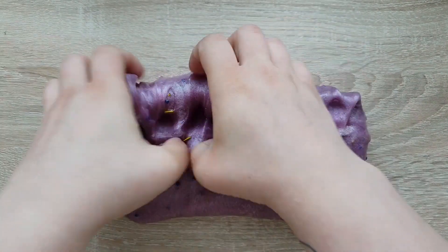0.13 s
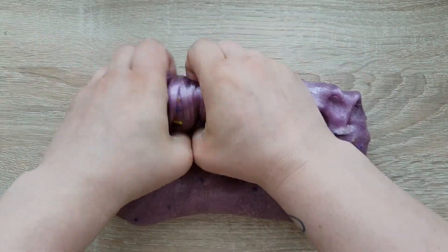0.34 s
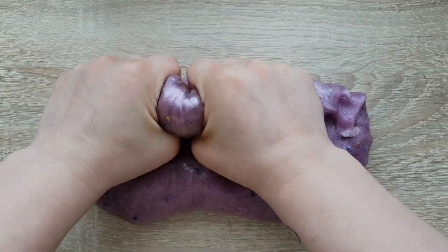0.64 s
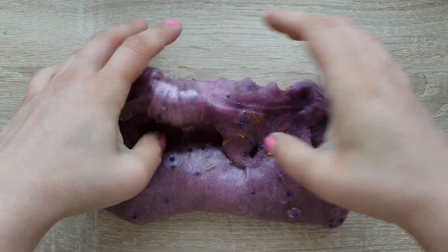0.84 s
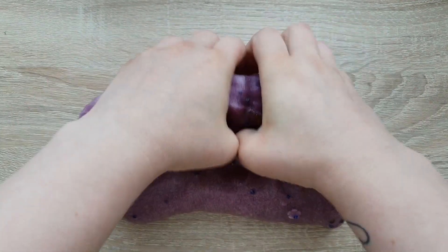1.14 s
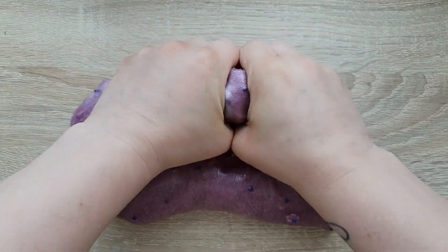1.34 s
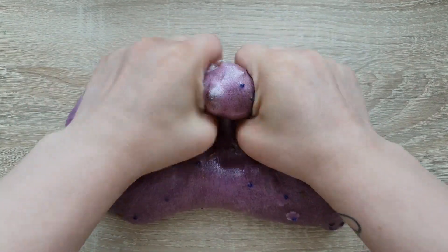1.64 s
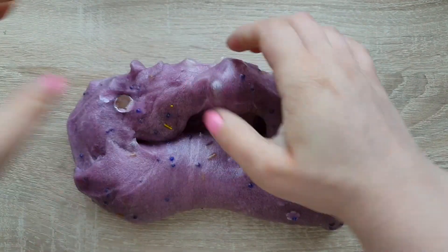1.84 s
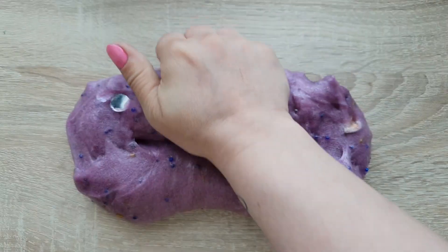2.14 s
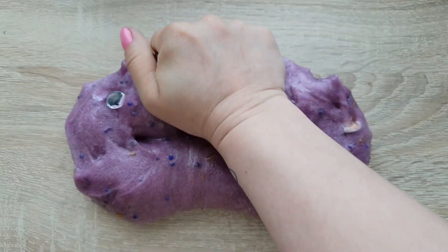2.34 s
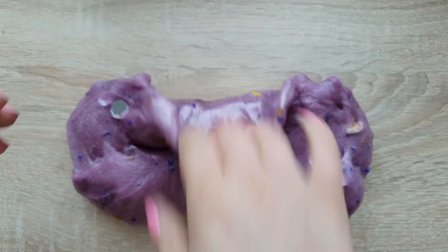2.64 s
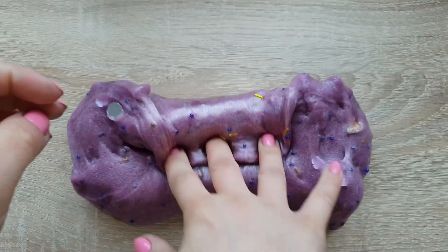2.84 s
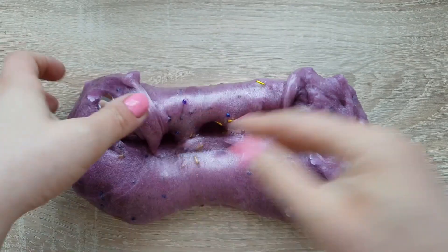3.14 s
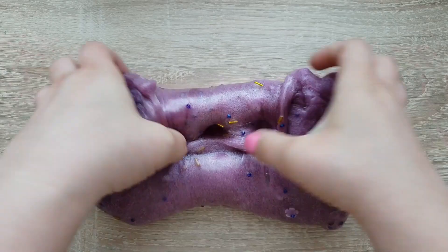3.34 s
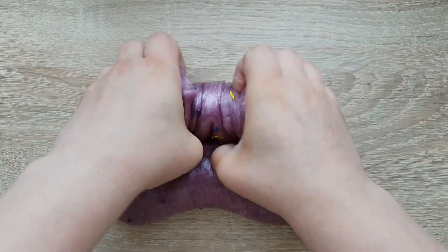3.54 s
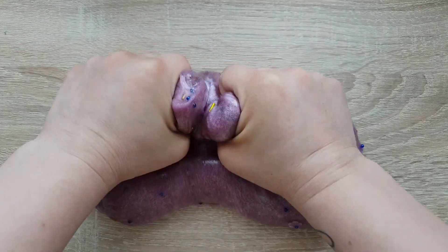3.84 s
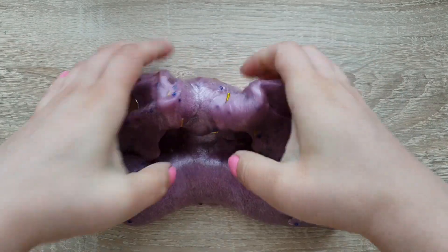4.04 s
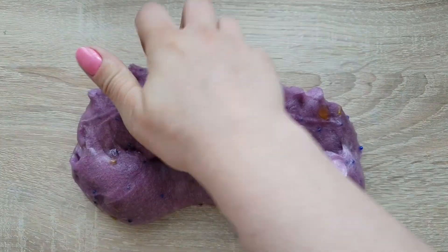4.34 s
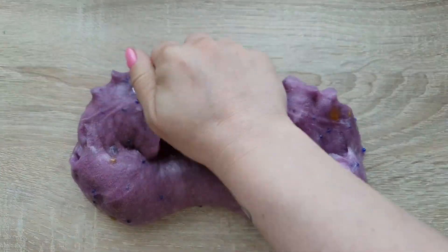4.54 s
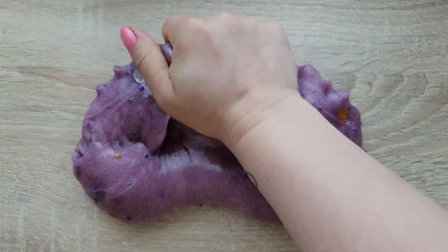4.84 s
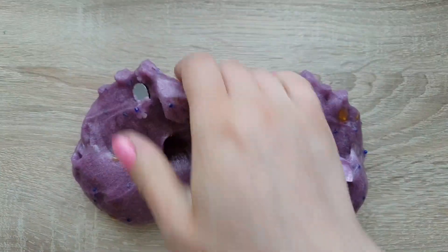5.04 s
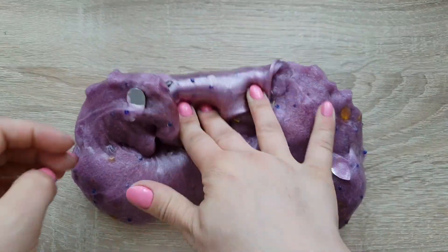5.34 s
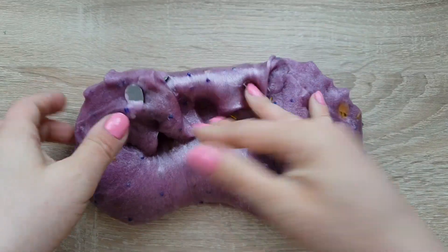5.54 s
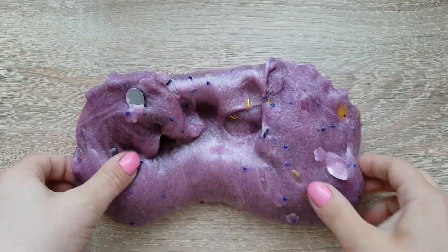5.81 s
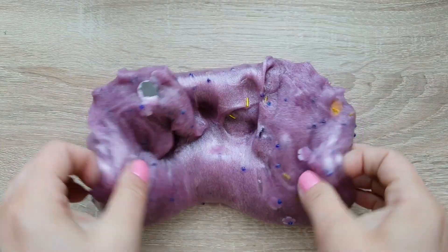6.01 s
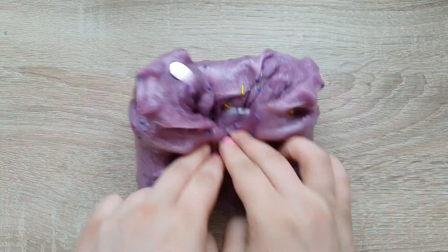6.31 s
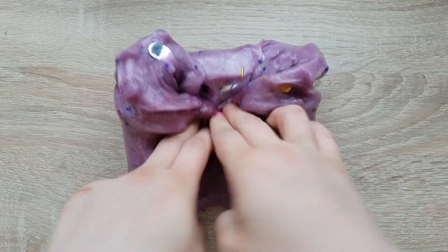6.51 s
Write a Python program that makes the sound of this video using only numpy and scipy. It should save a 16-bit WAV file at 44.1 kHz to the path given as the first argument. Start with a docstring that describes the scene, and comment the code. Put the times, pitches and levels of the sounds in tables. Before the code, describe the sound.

Close, wet pops and crackles come in uneven bursts as thick slime is kneaded by hand. The sharpest clusters fall in the first half, one followed by a faint squelch. Later the slime rubs and peels with a sticky fizz, and the hands bump the wooden table, most strongly at the end. It is heard in stereo from above, in a small, quiet room with a faint low rumble.

```python
"""A small room, a wooden table: two hands squeeze and fold a lump of thick slime.
Trapped air pockets burst as sharp pops, some with a brief tail; sticky skin peels off as a fizz
of tiny pops; a closing air gap squelches. Pushes, rubs and knocks ring the table top, and the
frame sways. Two spaced microphones listen from above, over faint house rumble and hiss."""
import sys
import numpy as np
from scipy import signal
from scipy.io import wavfile

SR = 44100
rng = np.random.default_rng(int(sys.argv[2]) if len(sys.argv) > 2 else 0)


def inscribe(sig):
    """Save sig as 16-bit PCM at rate SR to the path in sys.argv[1].

    A 1-D sig is mono; a 2-D sig holds one channel per row.
    Samples are clipped to [-1, 1] before scaling.
    """
    pcm = np.round(np.clip(np.atleast_2d(sig).T, -1, 1) * 32767)
    wavfile.write(sys.argv[1], SR, pcm.astype(np.int16))


N = 294147

# House rumble and microphone hiss. Each row: frequency in Hz, relative density in dB.
BACKGROUND_SPECTRUM = [(59, -25.5), (100, -3.5), (119, -11), (206, -1.5), (239, -3), (365, -53.5),
                       (570, -36.5), (1310, -37.5), (7610, -34.5), (16000, -57.5)]
# Diffuse sound. Each row: frequency in Hz, left-right correlation.
STEREO_LIKENESS = [(60, 0.43), (290, .92), (640, 0.11), (1400, 0.05), (3000, 0.008)]
# Resonances of legs and frame. Each row: centre in Hz, width in Hz, relative level in dB.
FRAME_MODES = [(49.6, 8.9, 4.5), (72.4, 42, -5.5), (92.2, 8.7, 5), (151, 120, 3.5)]
# Sway of the frame. Each row: time in seconds, level in dB.
SWAY_LEVELS = [(0.0, -57.5), (0.72, -84), (0.82, -60.5), (1.018, -72.5), (1.03, -45.5), (1.24, -67),
               (3.05, -66.5), (3.14, -53.5), (3.34, -65), (3.7, -68), (3.81, -55), (3.86, -63),
               (4.05, -62.5), (4.83, -71), (4.9, -64), (5.57, -53), (5.85, -57), (6.11, -53), (6.35, -57.5),
               (6.65, -47), (6.67, -58)]
# Table top modes. Each row: frequency in Hz, gain in dB, T60 in seconds.
TOP_MODES = [(173, -21.5, 0.14), (238, -8, 0.3), (287.8, -13.5, 0.18), (300, -4.5, 0.073), (399, -7, 0.077),
             (476.5, -4.5, 0.022), (547.6, 0.5, 0.086), (603, 3, 0.022), (903, -4, 0.055),
             (1182, -12.5, 0.028), (1402, -7.5, 0.006)]
# Hands lean on the top or let go. Each row: start and hold in seconds, relative level in dB.
HAND_PUSHES = [(0.0, 0.011, -41), (0.469, 0.36, -49), (0.81, 0.12, -55), (1.031, 0.035, -47),
               (1.248, 0.023, -55), (1.774, 0.03, -41), (2.216, 0.17, -46), (3.102, 0.053, -40.5),
               (3.702, 0.26, -51), (3.983, .03, -43.5), (4.953, 0.062, -47.5), (5.551, 0.032, -41.5),
               (6.205, 0.14, -51), (6.458, .05, -38.5), (6.617, .05, -29.5)]
# Slime rubbed along the top. Each row: start and hold in seconds, relative level in dB.
SLIME_RUBS = [(0.08, 0.025, -57), (1.03, 0.14, -68.5), (2.85, 0.16, -67.5), (3.1, 0.019, -40.5),
              (3.2, 0.36, -60.5), (5.305, 0.017, -67), (5.4, 0.044, -54.5), (5.525, 0.11, -48.5),
              (5.78, 0.017, -48.5), (5.93, 0.11, -46.5), (6.065, 0.095, -53.5), (6.43, 0.07, -54.5),
              (6.6, .07, -39)]
# Fingers and slime land. Each row: start in seconds, relative level in dB, slap over that in dB.
TABLE_KNOCKS = [(0.081, -37.5, -10), (0.405, -29.5, -24), (0.498, -39, 19.5), (0.515, -35, 10),
                (1.0225, -38.5, 3), (1.0327, -33.5, 0.5), (1.051, -36, -3), (1.068, -34.5, 6),
                (1.32, -47.5, 5), (1.41, -27.5, 12.5), (2.189, -35.5, 21), (2.317, -35, 17.5),
                (2.911, -43.5, -15), (3.08, -42.5, -8), (3.1, -21.5, -2), (3.321, -43.5, -0.5),
                (3.499, -37, 6), (3.654, -45.5, 13.5), (3.698, -39, 17.5), (3.768, -32.5, -9),
                (5.305, -36, 5), (5.368, -35, -12), (5.396, -26.5, -1), (5.531, -27.5, -13.5),
                (5.548, -31, -26), (5.927, -30.5, -5.5), (6.065, -37.5, -2), (6.423, -41.5, 6),
                (6.46, -39.5, 10), (6.489, -35, -4), (6.508, -33, 4), (6.565, -39, -8), (6.599, -24, -23),
                (6.613, -21.5, 0.5), (6.636, -23, -12), (6.656, -20, -23)]
# Faint fizz under slow hands. Each row: time in seconds, pocket and tick levels in dB.
CREEP_FIZZ = [(0.0, -67, -68), (0.2, -70, -76.5), (0.9, -79, -87), (1.15, -66.5, -66), (1.35, -64, -80.5),
              (2.1, -87.5, -83), (2.55, -52.5, -52.5), (2.86, -89, -72.5), (3.3, -73, -69.5),
              (3.45, -60, -59.5), (4.35, -88.5, -83), (4.65, -60.5, -69), (4.8, -73, -73),
              (4.9, -65, -62.5), (5.25, -83, -70.5), (5.7, -72.5, -72.5), (5.85, -73, -79),
              (6.35, -63.5, -62.5), (6.67, -77, -79)]
# Fizz after a burst. Each row: start and hold in seconds, pocket, tick and sizzle levels in dB.
AFTER_FIZZ = [(0.25, 0.0049, -61.5, -53, -66.5), (0.4, 0.11, -55.5, -41, -55.5),
              (0.49, 0.082, -49.5, -40.5, -55.5), (0.605, 0.0074, -69.5, -33.5, -50.5),
              (1.395, 0.055, -44, -41.5, -40), (1.475, 0.016, -62, -43, -40), (1.55, 0.052, -53, -46, -49),
              (2.195, 0.056, -43, -59.5, -59), (2.33, 0.013, -60.5, -38, -59),
              (2.375, 0.018, -45.5, -42.5, -78), (3.505, .04, -62.5, -58, -44.5),
              (3.6, 0.014, -65, -57, -59), (3.72, 0.017, -51.5, -43, -55), (3.805, 0.0087, -64, -36, -40.5),
              (4.5, 0.08, -71, -66.5, -89.5), (6.03, 0.08, -66, -58, -54)]
# Skin comes unstuck. Each row: start and hold in seconds, pocket and tick levels in dB.
SKIN_PEELS = [(0.735, 0.029, -40.5, -44), (1.06, 0.0077, -52, -67), (1.7, 0.0078, -39, -44),
              (2.74, 0.0064, -79, -66), (2.93, 0.02, -67.5, -59.5), (3.105, 0.0041, -51.5, -43),
              (3.98, 0.04, -41, -44), (4.96, 0.012, -43, -45.5), (5.37, 0.0043, -48, -58),
              (5.535, 0.014, -48, -46.5), (5.935, 0.29, -55.5, -51.5), (6.47, 0.015, -68, -64),
              (6.605, .07, -42.5, -45.5)]
# Air pockets burst. Each row: start in seconds, cavity pitch in Hz and relative level in dB,
# film pitch in Hz and relative level in dB, relative snap level in dB, ragged trail offset in dB.
POCKET_POPS = [(0.2183,3100,-34,7000,-31,-31,-5.5),(0.3434,2720,-26,6030,-18.5,-17,-6),(.395,2380,-34,5370,-9.5,-8.5,-4),(0.4038,2660,-34,4300,-13,-29,-2),
               (0.4163,2830,-29,14000,-18,-25,2),(.435,734,-50,5800,-36,-25,-3),(.457,2430,-44,13500,-16,-21,1),(.481,2160,-9.5,8500,-6.5,-4,-4),
               (0.4976,2220,-18.5,5700,-6,-12,0.5),(.5165,1680,-21.5,5100,-48,-22,-2),(.5804,1630,-20.5,3140,-18.5,-42,-1),(.599,2000,-26,11400,-25,-8,1),
               (.617,2200,-33,7780,-28,-18,-3),(.849,1600,-52,2970,-39,-62,-3),(1.023,2010,-42,3600,-45,-59,0),(1.031,1002,-40,4490,-39,-54.5,-0.5),(1.063,1900,-28,4030,-37,-59,3),
               (1.151,1500,-66,13000,-42,-56,0),(1.3222,800,-59.5,3300,-44.5,-51,1),(1.3783,1980,-58,5050,-65,-43.5,0),(1.3855,2620,-29,12500,-21,-33,5),
               (1.3918,2530,-21,4030,-12.5,-8.5,-1),(1.4104,1350,-14,2870,-19.5,-32,3.5),(1.4694,1800,-24.5,7350,-16,-20.5,-0.5),(1.4904,2800,-35,8300,-19,-12.5,-2.5),
               (1.5444,2210,-22.5,7000,-24,-11.5,-3.5),(2.1897,2310,-14,4400,-17.5,-24,-2.5),(2.2973,2020,-25,5300,-26,-39,-2),(2.318,784,-23.5,4300,-35,-47,-3),
               (2.3224,2250,-24,7000,-14,-22,-4),(2.3252,1720,-29,6400,-10.5,-22,1.5),(2.3624,1450,-8.5,5050,-12.5,-20,1),(2.372,2320,-12.5,6600,-17,-19,-1.5),
               (2.794,2400,-49,4500,-46,-51,2.5),(2.857,2420,-71,7500,-56,-64,-6),(2.884,2390,-69,7000,-45,-56,-3),(2.9,2400,-62,6470,-48,-45,-3),
               (2.917,930,-71,7000,-42.5,-47,-2),(2.9401,800,-49.5,6560,-53,-42,-3),(2.951,2260,-54,7400,-37,-40,0),(2.97,2410,-49,4400,-48,-49,3),
               (2.9797,1030,-61,7150,-45,-34,0.5),(3.0941,2500,-33,8000,-25,-15,-1.5),(3.097,710,-26.5,3070,-29,-17,-4.5),(3.4022,960,-51,4640,-40,-53,-1),
               (3.456,1010,-57,14500,-35,-44,1),(3.4593,1510,-48,7660,-35,-37,2.5),(3.4892,2060,-52,3500,-30.5,-40,-2),(3.4979,2480,-47,11600,-6.5,-19,-5.5),
               (3.599,2580,-33.5,4660,-33.5,-46,-1.5),(3.6548,1930,-23.5,3540,-27,-45,-4),(3.6605,2440,-24,9000,-12,-16,1),(3.6644,1720,-23.5,4100,-21,-37,-3),
               (3.6839,2750,-27,5500,-23,-22,-1),(3.6985,910,-28,8500,-17,-9.5,-3),(3.7141,930,-38,2900,-30.5,-35.5,2),(3.7626,2200,-20.5,4360,-34,-13,-6),
               (3.7982,2080,-30,7000,-25,-5,-3),(3.8328,2200,-48,4530,-34.5,-28,5),(3.9975,1860,-26.5,3780,-36,-27.5,0),(3.9994,850,-24,6000,-29,-31,4.5),
               (4.1111,1850,-44.5,10560,-33,-39,-1),(4.431,1410,-69,4550,-54.5,-38,-7.5),(4.4925,2000,-61,5980,-48,-64.5,0.5),(4.533,2000,-74,6500,-40.5,-56,-3.5),(4.622,2500,-52,4500,-56,-65,-7),
               (4.643,1630,-42.5,6100,-48,-38,-1.5),(4.6784,2400,-37.5,4180,-58,-74,-5),(4.694,2410,-45,7550,-37.5,-39,-2.5),(4.698,2000,-47,6000,-46,-48,1),(4.74,2000,-55,6000,-58,-47,-4),
               (4.7701,1980,-32.5,4180,-38,-46,1),(4.862,2400,-60,3980,-49.5,-62.5,-3),(5.307,950,-30.5,3500,-53,-49,-0.5),(5.3493,1350,-36,7500,-46,-56,0),
               (5.367,2910,-48,5400,-32.5,-33.5,-0.5),(5.397,680,-39,2580,-35,-49,-5),(5.521,2780,-51.5,9000,-33,-44,7),(5.548,710,-26,3020,-55,-60,-3),
               (5.5735,950,-29.5,3000,-48,-60.5,-2),(5.97,3020,-29,7400,-32.5,-47,0.5),(6.0243,2240,-28.5,13700,-27,-27,-0.5),(6.065,960,-35,6100,-53,-28,-1.5),
               (6.106,2180,-40,3530,-36,-44,-3),(6.1458,1960,-56,3530,-37,-37,1),(6.2014,2430,-46,4100,-22.5,-34,-3),(6.2806,1960,-27.5,6050,-40,-60,-3),
               (6.345,2920,-28.5,13000,-39,-38,2),(6.376,2500,-31,13600,-17,-33,-3),(6.4425,870,-44,6000,-37,-42,-1),(6.597,627,-44,7000,-42,-42,7),
               (6.613,520,-22,4800,-26,-26,3),(6.656,2700,-23,5600,-38,-33,6)]
# Noise lingering after a pop or knock. Each row: start and hold in seconds, centre in Hz, level in dB.
POP_TAILS = [(0.39, 0.027, 4600, -50), (0.485, 0.039, 8200, -37), (0.602, 0.041, 11200, -37.5),
             (1.059, .018, 2110, -51.5), (1.066, .016, 1010, -50), (1.385, .02, 12400, -32),
             (2.187, 0.059, 12000, -49), (2.37, 0.039, 7300, -38.5), (3.506, 0.036, 10600, -44),
             (6.602, 0.085, 392, -35), (6.609, 0.041, 2720, -42)]
# A closing air gap. Each row: time in seconds, pitch in Hz, level in dB.
SQUELCH_PATH = [(2.38, 1355, -92), (2.45, 1370, -59), (2.6, 1500, -54), (2.7, 1614, -80),
                (2.745, 2044, -59), (2.78, 2020, -90)]
# Reverberation. Each row: frequency in Hz, T60 in seconds, relative level in dB.
ROOM_BANDS = [(197.8, 0.89, -8.5), (497, 0.45, -5), (1558, 0.44, -4.5), (3390, 0.4, -0.5), (7000, 0.25, 0),
              (10830, 0.1, 5), (15500, 0.19, -4)]

POP_SAMPLES = 600


def from_db(db):
    return 10 ** (np.asarray(db) / 20)


def unit_rms(x):
    return x / np.sqrt(np.mean(x ** 2) + 1e-20)


def at_hz(rows, hz, column=1):
    rows = np.array(rows)
    return np.interp(np.log(hz), np.log(rows[:, 0]), rows[:, column])


def in_time(rows):
    time_s, *columns = np.transpose(rows)
    return [np.interp(np.arange(N) / SR, time_s, column) for column in columns]


def band(x, low_hz, high_hz):
    sos = signal.butter(2, [low_hz, min(high_hz, 20000)], "band", fs=SR, output="sos")
    return signal.sosfilt(sos, x)


def ring(clicks, hz, t60_s):
    """A unit click starts a decaying sine of height 1."""
    r, w = from_db(-60 / (t60_s * SR)), 2 * np.pi * hz / SR
    return signal.lfilter([0, np.sin(w)], [1, -2 * r * np.cos(w), r * r], clicks + 1e-18)


def wet_ring(hz, level_db, t60_cycles):
    """A few damped cycles with a rounded start."""
    cycles = hz * np.arange(POP_SAMPLES) / SR
    onset = 1 - np.exp(-cycles / 1.215)
    return np.sin(2 * np.pi * cycles) * onset * from_db(level_db - 60 * cycles / t60_cycles)


def grains(per_s, spread_db):
    """Random clicks of uneven size and sign; rms 1."""
    sizes = from_db(spread_db * np.minimum(rng.exponential(1, N), 3.0)) * rng.choice([-1, 1], N)
    return unit_rms(sizes * (rng.random(N) < per_s / SR))


def bursts(starts, t60_s, alike):
    """Each start sets off dying noise, partly shared by both sides."""
    shared = np.sqrt(alike) * rng.standard_normal(N)
    noise = shared + np.sqrt(1 - alike) * rng.standard_normal((2, N))
    return noise * signal.lfilter([1], [1, -from_db(-60 / (t60_s * SR))], starts + 1e-18)


def diffuse(size, gain_at_hz):
    """Stereo noise in half-octave bands; the sides part towards the treble."""
    out, edges_hz = 0, 28 * 2 ** np.arange(0, 10, .5)
    white = rng.standard_normal((2, 2, size))
    for k, (low_hz, high_hz) in enumerate(zip(edges_hz, edges_hz[1:])):
        mid, side = band(white[k % 2], low_hz, high_hz)
        hz = np.sqrt(low_hz * high_hz)
        alike = at_hz(STEREO_LIKENESS, hz)
        out += gain_at_hz(hz) * (np.sqrt(1 + alike) * mid + np.sqrt(1 - alike) * side * [[1], [-1]])
    return out


def swells(rows, rise_db_per_s, fall_db_per_s):
    """Rows rise, hold, fall and add in power; one dB curve per level column."""
    t, rows = np.arange(0, N + 64, 64) / SR, np.array(rows)
    start_s, end_s = rows[:, [0]], rows[:, [0]] + rows[:, [1]]
    shape_db = -rise_db_per_s * np.maximum(start_s - t, 0) - fall_db_per_s * np.maximum(t - end_s, 0)
    power = from_db(2 * rows[:, 2:].T) @ from_db(2 * shape_db) + 1e-14
    return np.array([np.interp(np.arange(N) / SR, t, 10 * np.log10(p)) for p in power])


def background(level_db=-77):
    """Steady house rumble and microphone hiss."""
    noise = diffuse(N, lambda hz: from_db(at_hz(BACKGROUND_SPECTRUM, hz)))
    return from_db(level_db) * unit_rms(noise)


def frame_sway():
    """The whole table rocks at a few broad, low resonances."""
    level_db, = in_time(SWAY_LEVELS)
    modes = [from_db(db) * unit_rms(band(rng.standard_normal(N), hz - width_hz / 2, hz + width_hz / 2))
             for hz, width_hz, db in FRAME_MODES]
    side = [[.15], [-.15]] * sum(modes[1::2])[::-1]
    return from_db(level_db) * unit_rms(sum(modes) + side)


def table_top(peel_db):
    """Pushes drive the low modes, rubs and tugs of the fizzing slime the higher; knocks ring all, thump and
    slap."""
    push_db, = swells(HAND_PUSHES, rise_db_per_s=503.5, fall_db_per_s=88.5)
    rub_db, = swells(SLIME_RUBS, rise_db_per_s=901.5, fall_db_per_s=199)
    tugs = grains(per_s=600, spread_db=4.8) * (from_db(rub_db - 28) + from_db(peel_db - 39))
    kneading = rng.standard_normal(N) * from_db(push_db - 30.5)
    push_s, _, thud_db = np.transpose(HAND_PUSHES)
    kneading[(push_s * SR).astype(int)] += from_db(thud_db + 2.5)   # each push opens with a thud
    knock_s, knock_db, slap_db = np.transpose(TABLE_KNOCKS)
    at = (knock_s * SR).astype(int)
    scatter_db = rng.normal(0, 2.5, (len(at), len(TOP_MODES)))
    wood, thumps, slaps = np.zeros((3, N))
    for k, (hz, gain_db, t60_s) in enumerate(TOP_MODES):
        # A fingertip hardly moves the lowest modes.
        drive, coupling_db = (kneading.copy(), -18) if hz < 300 else (tugs.copy(), -11)
        drive[at] += from_db(knock_db + coupling_db + scatter_db[:, k])
        wood += (-1) ** k * from_db(gain_db) * ring(drive, hz, t60_s)
    thumps[at] = from_db(knock_db + 16.5)   # soft weight of the hand
    slaps[at] = from_db(knock_db + slap_db)
    return wood + band(thumps + 1e-18, 60, 230) + band(bursts(slaps, t60_s=.045, alike=.8), 400, 2500)


def fizz_levels():
    """dB curves for fizz(); peels, after-fizz and creep add in power."""
    peel_db = swells(SKIN_PEELS, rise_db_per_s=460, fall_db_per_s=159)
    *after_db, sizzle_db = swells(AFTER_FIZZ, rise_db_per_s=3000.5, fall_db_per_s=120)
    creep_db = in_time(CREEP_FIZZ)
    pocket_db, tick_db = 10 * np.log10(sum(from_db(db) ** 2 for db in (peel_db, after_db, creep_db)))
    suction_db = peel_db[0] - 17.5   # peels also open the largest pockets
    crackle_db = creep_db[1] - 8.5   # lone ticks follow the creep
    return pocket_db, tick_db, suction_db, sizzle_db, crackle_db


def fizz(pocket_db, tick_db, suction_db, sizzle_db, crackle_db):
    """Tiny pockets open along the peeling contact: larger ones ring, the finest only tick."""
    pockets = np.zeros((2, N))
    size_class = rng.integers(0, 16, N)
    clicks = grains(per_s=2000, spread_db=3.5)
    for k, hz in enumerate(np.geomspace(600, 5000, 16)):
        pocket = ring(clicks * (size_class == k), hz, t60_s=8.8 / hz) * (hz / 1500) ** 1.03
        pockets[0] += pocket
        pockets[1] += np.roll(pocket, (k * 5) % 9 - 4)   # each size sits elsewhere on the lump
    ticks = band(np.array([grains(per_s=4000, spread_db=3.5) for _ in range(2)]), 4500, 14000)
    lone_ticks = grains(per_s=70, spread_db=4.7)
    crackle = sum(band(lone_ticks * (size_class % 3 == k), hz, 2.2 * hz) * 1800 / hz
                  for k, hz in enumerate([1800, 3500, 6000]))
    suction = band(pockets, 620, 1900)
    sizzle = band(ticks[:, ::-1], 9000, 19000)
    layers = [(pockets, pocket_db), (ticks, tick_db), (suction, suction_db),
              (sizzle, sizzle_db), (crackle, crackle_db)]
    return sum(from_db(db) * unit_rms(x) for x, db in layers)


def pops():
    """Cavity and torn film ring over a bright snap; the ragged tear trails on. Gives direct, trail."""
    pan_db = rng.normal(2, 2, len(POCKET_POPS))   # left minus right
    rings, tears, snaps, snap_trails = np.zeros((4, 2, N + POP_SAMPLES))
    tear_decay = from_db(-60 * np.arange(POP_SAMPLES) / SR / 0.018)
    for k, (start_s, cavity_hz, cavity_db, film_hz, film_db, snap_db, ragged_db) in enumerate(POCKET_POPS):
        at = int(start_s * SR)
        span = slice(at, at + POP_SAMPLES)
        sides = from_db([[pan_db[k] / 2], [-pan_db[k] / 2]])
        cavity = wet_ring(cavity_hz, cavity_db + 12.5, t60_cycles=5.3)
        film = wet_ring(film_hz, film_db + 19.5, t60_cycles=4.8)
        rings[:, span] += sides * (cavity + film)
        tear = band(rng.standard_normal((2, POP_SAMPLES)) * tear_decay, film_hz / 1.55, film_hz * 1.41)
        tears[:, span] += sides * from_db(film_db + ragged_db) * 5500 / film_hz * tear
        snaps[:, [at]] = sides * from_db(snap_db)
        snap_trails[:, [at]] = sides * from_db(snap_db + ragged_db)
    direct = rings + from_db(14) * band(snaps + 1e-18, 6000, 15000)
    bright_trail = band(bursts(snap_trails[:, :N], t60_s=0.015, alike=0.039), 5000, 15500)
    return direct[:, :N], tears[:, :N] + from_db(-2) * bright_trail


def pop_tails(edge_ratio=1.12, fall_db_per_s=200):
    """Brief narrow-band noise lingers after a pop or knock, then fades."""
    t, out = np.arange(SR // 2) / SR, np.zeros((2, N + SR))
    for start_s, hold_s, hz, db in POP_TAILS:
        white = rng.standard_normal((3, len(t)))
        noise = white[0] if hz < 1500 else white[1:]   # low tails reach both sides alike
        tail = unit_rms(band(noise, hz / edge_ratio, hz * edge_ratio))
        at = int(start_s * SR)
        out[:, at:at + len(t)] += tail * from_db(db - fall_db_per_s * np.maximum(t - hold_s, 0))
    return out[:, :N]


def squelch(width_hz=590):
    """A closing air gap: narrow-band noise rising in pitch."""
    pitch_hz, level_db = in_time(SQUELCH_PATH)
    lowpass = signal.butter(2, width_hz / 2, fs=SR, output="sos")
    in_phase, quadrature = signal.sosfilt(lowpass, rng.standard_normal((2, N)))
    phase, t = 2 * np.pi * np.cumsum(pitch_hz) / SR, np.arange(N) / SR
    sounding = (t > SQUELCH_PATH[0][0]) & (t < SQUELCH_PATH[-1][0])
    return from_db(level_db) * sounding * unit_rms(in_phase * np.cos(phase) + quadrature * np.sin(phase))


def room(x, gap_s=.003, rise_s=.005):
    """Early wall echoes melt into diffuse noise that dies band by band."""
    t = np.arange(SR // 2) / SR
    rise = np.clip((t - gap_s) / rise_s, 0, 1)
    echoes = np.repeat(rng.standard_normal(len(t) // 24 + 1), 24)[:len(t)]
    echo_gain = from_db(4 * echoes * np.exp(-t / .04))

    def decay(hz):
        return from_db(at_hz(ROOM_BANDS, hz, column=2) - 34 - 60 * t / at_hz(ROOM_BANDS, hz))

    response = diffuse(len(t), decay) * rise * echo_gain
    return signal.fftconvolve(x[None], response, axes=1)[:, :N]


def scene(right_lag_samples=4):
    """Slime and table close by, their reverberation, the background."""
    pocket_db, *other_db = fizz_levels()
    balance = from_db([[.8], [-.8]])   # left microphone is more sensitive
    pop_direct, pop_trail = pops()
    handling = (fizz(pocket_db, *other_db) + squelch() + pop_tails() + table_top(pocket_db)) * balance
    room_feed = handling + from_db(-1.5) * pop_direct   # pops face up and feed the walls less
    reverb = room(room_feed.mean(axis=0)) * balance
    near = handling + pop_direct
    near[1] = np.roll(near[1], right_lag_samples)
    return near + pop_trail + reverb + (background() + frame_sway()) * balance


def record(dry):
    """Clip at full scale, then a steep low-pass."""
    stop_hz = 16200
    return signal.sosfilt(signal.cheby2(22, 75, stop_hz, fs=SR, output="sos"), np.clip(dry, -1, 1))


dry = scene()
out = record(dry)
inscribe(out)
```